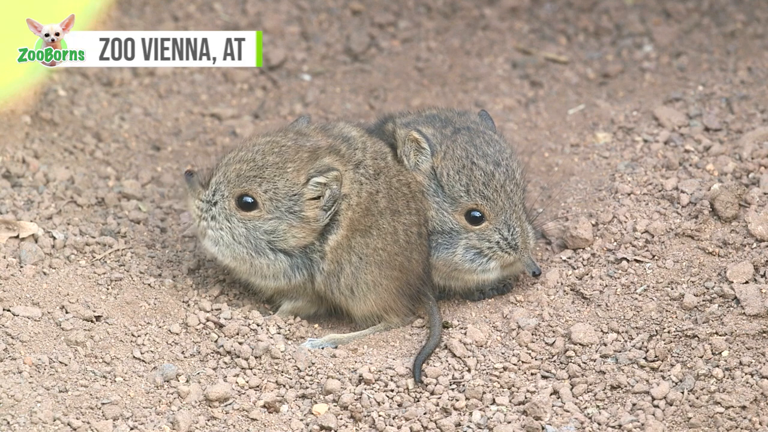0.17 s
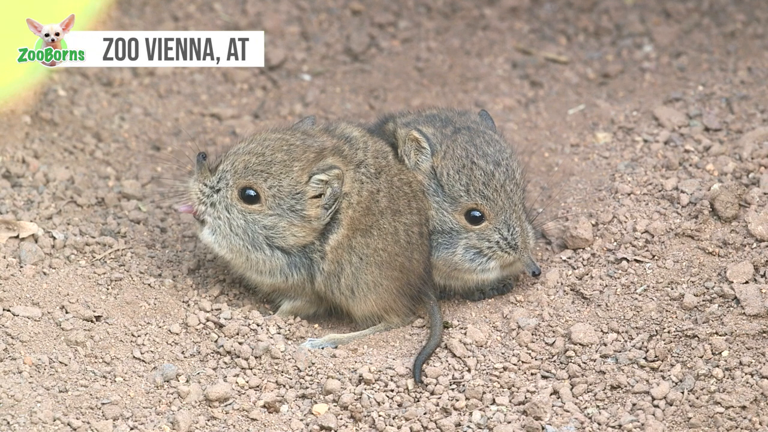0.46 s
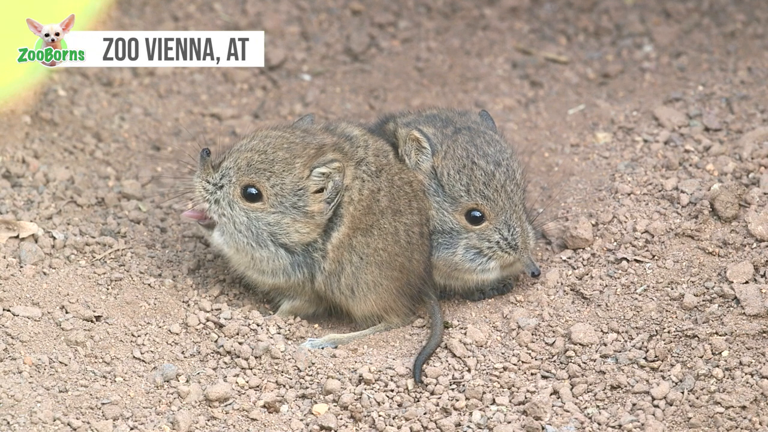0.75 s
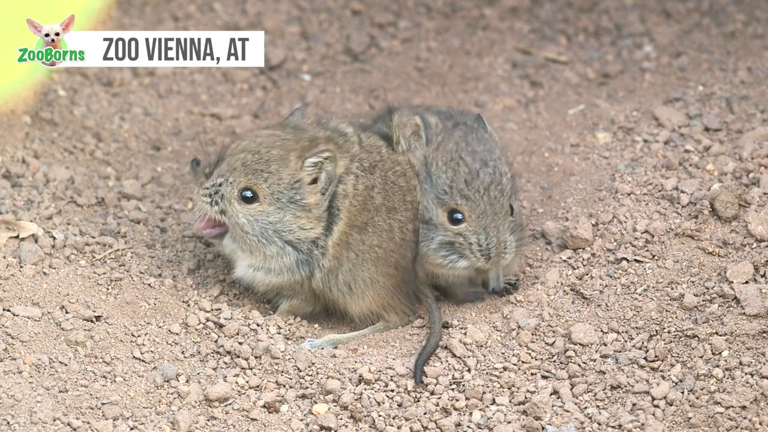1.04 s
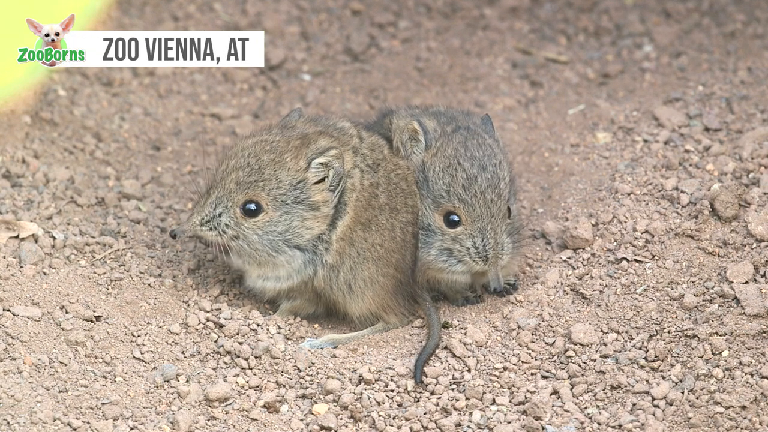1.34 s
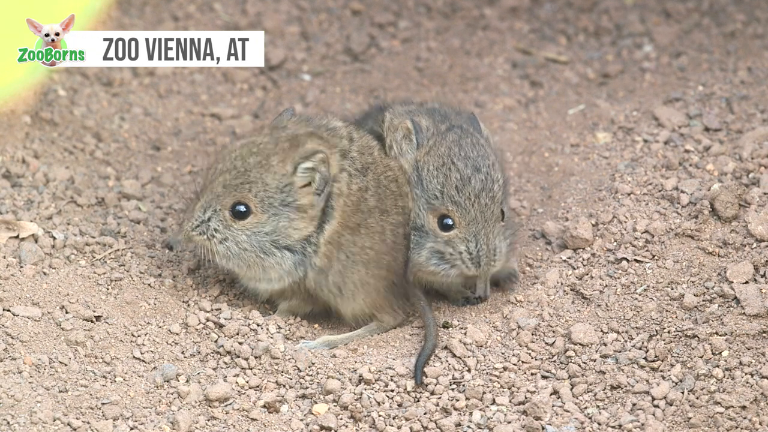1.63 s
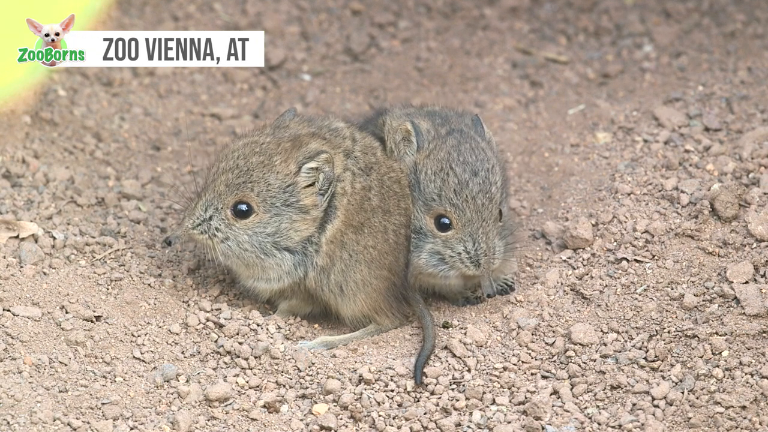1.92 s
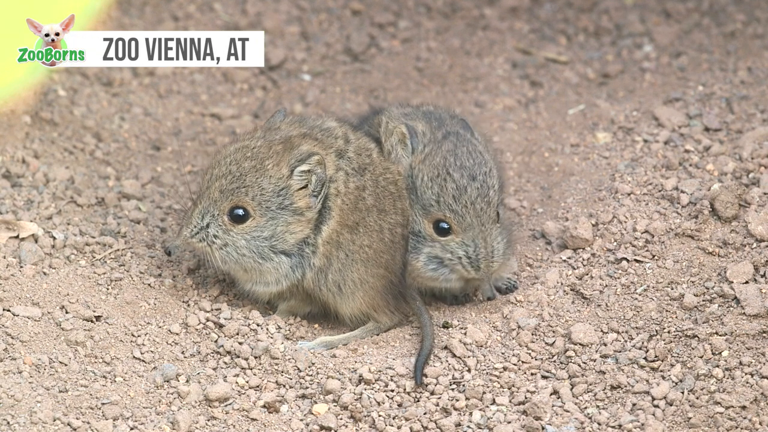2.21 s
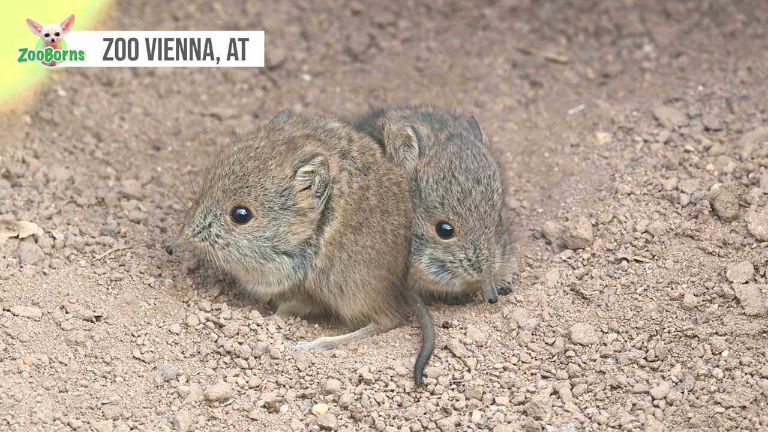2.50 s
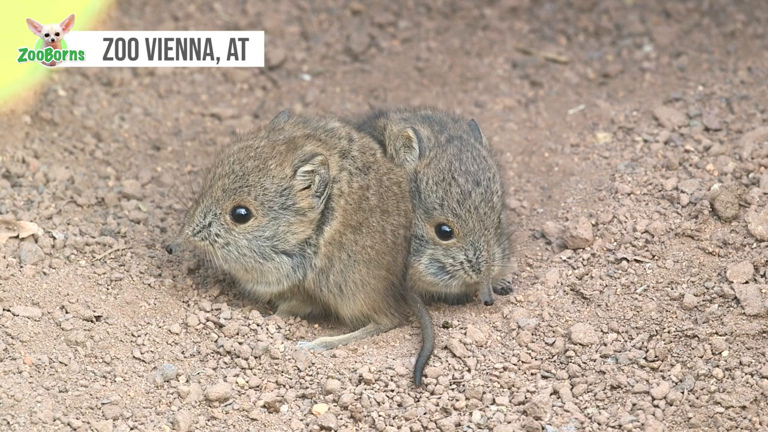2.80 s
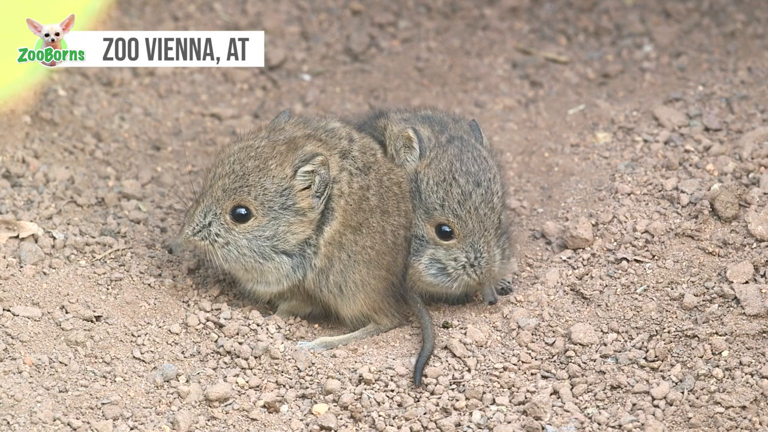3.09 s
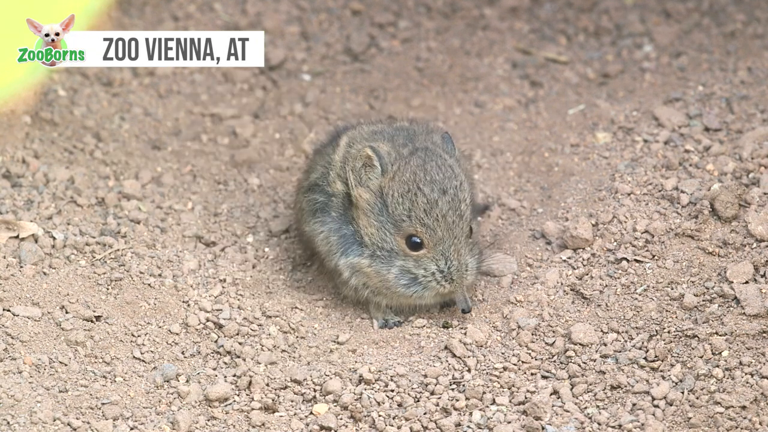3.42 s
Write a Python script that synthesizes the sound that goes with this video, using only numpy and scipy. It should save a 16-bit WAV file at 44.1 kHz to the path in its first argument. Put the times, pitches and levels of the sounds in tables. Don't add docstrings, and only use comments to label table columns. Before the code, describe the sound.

Many birds chirp and twitter in a large echoing indoor hall over low ventilation rumble.

```python
import sys
import numpy as np
from scipy import signal
from scipy.fft import rfft, irfft, next_fast_len
from scipy.io import wavfile
from scipy.ndimage import map_coordinates

SR = 44100
rng = np.random.default_rng(int(sys.argv[2]) if len(sys.argv) > 2 else 0)


def boost(x):
    u = np.asarray(x, float) / 20
    return 10 ** u


def to_wav(sig):
    pcm = np.clip(np.atleast_2d(sig), -1, 1) * 32767
    pcm = np.round(pcm).astype(np.int16)
    wavfile.write(sys.argv[1], SR, pcm.T)


N = 156555
ATTACK_S, RELEASE_S = .009, .006


def unit(x):
    return x / np.sqrt(np.mean(x ** 2) + 1e-20)


def along(points, hz):
    f, v = np.transpose(points)
    return np.interp(np.log(hz + 1), np.log(f + 1), v)


def over_time(points):
    return np.interp(np.arange(N) / SR, *np.transpose(points))


def wobble(rate, size):
    knots = rng.standard_normal(int(size * rate / SR) + 4)
    return map_coordinates(knots, [np.arange(size) * rate / SR])


def coloured(x, gain_db):
    m = next_fast_len(len(x) + 8192)
    gain = boost(gain_db(np.fft.rfftfreq(m, 1 / SR)))
    return irfft(rfft(x, m) * gain, m)[:len(x)]


def noise(spectrum):
    return unit(coloured(rng.standard_normal(N), lambda hz: along(spectrum, hz)))


def place(out, start, sound):
    out[start:][:len(sound)] += sound


def shape(t, length):
    return np.clip(np.minimum(t / ATTACK_S, (length - t) / RELEASE_S + .5), 0, 1)


def whistles(rows, tones, rough_hz, flutter_db, flutter_rate):
    out = np.zeros(N + SR)
    for s, length, start, end, db in rows:
        t = np.arange(int((length + RELEASE_S) * SR)) / SR
        hz = start + (end - start) * t / length + rough_hz * wobble(700, size=len(t))
        phase = 2 * np.pi * np.cumsum(hz) / SR
        note = sum(boost(g) * np.sin(k * phase) * (k * hz < SR / 2.2) for k, g in tones)
        strength = boost(db + 5.0 + flutter_db * wobble(flutter_rate, size=len(t)))
        place(out, round(s * SR), strength * shape(t, length) * note)
    return out[:N]


# frequency_hz, t60_s
HALL_DECAY = [(500, 1.95), (2000, 1.39), (4000, 1.08), (7000, 0.74), (12000, 0.35)]


def hall(x, direct_db, wet_db):
    out = boost(direct_db) * np.pad(x, (0, 2 * SR))
    step = SR // 6
    fade = signal.windows.hann(2 * step, sym=False)
    x = np.pad(x, (step, 2 * step))
    for at in range(0, N + step, step):
        part = x[at:at + 2 * step] * fade
        if part.any():
            hz, t, z = signal.stft(rng.standard_normal(SR), SR, nperseg=256)
            decay = boost(-60 * t / along(HALL_DECAY, hz)[:, None])
            tail = signal.istft(z * decay, SR, nperseg=256)[1]
            wet = signal.fftconvolve(part, tail / np.linalg.norm(tail))[max(step - at, 0):]
            place(out, max(at - step, 0), boost(wet_db) * wet)
    return out[:N]


# frequency_hz, density_db_per_hz
RUMBLE = [(53, -10.5), (90, -3), (189, 1), (210, -3), (441, -8), (479, -9), (698, -8), (1500, -22),
          (1950, -33), (3300, -120)]
# time_s, swell_db
FAN_LOAD = [(0, -4.5), (.5, 0), (1.1, -0.5), (1.4, 3), (2.2, 0), (2.6, -2.5), (3.3, -0.5), (3.55, 3)]
# time_s, strength_db
DRAUGHT = [(0.0, -77), (0.31, -55), (0.45, -62), (0.72, -52.5), (0.77, -63), (1.24, -57), (1.3, -74),
           (1.361, -65), (2.04, -58), (2.06, -64), (2.5, -56), (3.0, -69), (3.52, -51), (3.55, -53)]
# frequency_hz, density_db_per_hz
BUFFET = [(12, -41), (25, -18), (45, -12), (64, -1.5), (90, -15), (140, -120)]
# pitch_hz, level_db
HUM = [(64, -75), (126, -70.5)]
# frequency_hz, density_db_per_hz
HISS = [(1200, -120), (1700, -2.5), (5000, -4), (9000, -22.5), (15800, -31)]


def ventilation():
    rumble = noise(RUMBLE) * boost(-57 + over_time(FAN_LOAD) + 1.2 * wobble(3.12, size=N))
    draught = boost(over_time(DRAUGHT) - 1.5) * noise(BUFFET)
    hum = np.zeros(N)
    for hz, db in HUM:
        strength = boost(db + 3.5 + 3.7 * wobble(3.66, size=N))
        hum += strength * np.sin(2 * np.pi * np.cumsum(hz + 2.46 * wobble(3.9, size=N)) / SR)
    return rumble + draught + hum + boost(-55.5) * noise(HISS)


# time_s, activity_db
CROWD = [(0.0, -36), (.2, -41), (.45, -39), (0.69, -37.5), (1.18, -42), (1.48, -38), (1.93, -47),
         (2.45, -47), (2.61, -32.5), (2.77, -36.5), (3.55, -41)]
# multiple, level_db
TWEET_TONES = [(1, 0), (2, -40)]


def crowd(count=260):
    at, pitch, fall, long, size = rng.standard_normal((count, 5)).T
    s = (np.arange(count) + .5 + np.tanh(at) / 2) * N / SR / (count + 1)
    turn = 2 * (np.arange(count) * .382 % 1) - 1
    hz = 3650 * np.exp(.25 * (turn + .15 * pitch))
    end_hz = hz * np.exp(-.12 * (1 + np.tanh(fall) / 2))
    length = .04 * np.exp(.4 * long)
    db = np.interp(s, *np.transpose(CROWD)) - 10.5 + 1.5 * size
    rows = np.transpose([s, length, hz, end_hz, db])
    return whistles(rows, TWEET_TONES, rough_hz=190, flutter_db=4.5, flutter_rate=109.3)


# frequency_hz, density_db_per_hz
THROAT = [(530, -68.5), (900, -29.5), (1750, -13), (2280, -13), (2750, -3), (5110, -10), (6800, -29),
          (15700, -58.5)]


def earlier_calls():
    fade_db = -43.5 - 60 * np.arange(N) / SR / 1.8
    return noise(THROAT) * boost(fade_db)


# start_s, length_s, buzz_hz, level_db, brightness_db_per_octave
CHIRPS = [(0.01, 0.072, 715, -63, -10), (0.282, 0.05, 722, -53.5, -5), (0.42, .14, 799.4, -41.5, 4.5),
          (0.601, 0.082, 749.4, -37.5, -2), (0.755, 0.086, 761, -39, 5), (0.909, .14, 822, -38, 3.5),
          (1.16, 0.095, 708, -46.5, 10.5), (1.305, .12, 812, -36.5, 4), (1.43, 0.11, 740, -39.5, 1.5),
          (1.671, 0.061, 698.5, -43, -2.5), (1.855, 0.077, 780, -42.5, 12), (2.076, 0.059, 762, -41, 6),
          (2.376, 0.052, 689, -49.5, 9), (2.525, .06, 812, -38.5, 5), (2.569, 0.11, 801.5, -39, 5),
          (2.662, 0.085, 743, -45, -2), (2.879, 0.062, 743, -46, 2.5), (3.063, .12, 826, -33.5, 2),
          (3.298, .14, 764, -38, 2.5), (3.507, 0.028, 804, -43, 8)]


def chirps(sag=.15, jitter=.12, scatter_db=4):
    out = np.zeros(N + SR)
    lead = 400
    for s, length, rate, db, bright in CHIRPS:
        t = np.arange(int((length + RELEASE_S) * SR)) / SR
        buzz_hz = rate * (1 - sag * t / length + jitter * wobble(400, size=len(t)))
        cycles = np.cumsum(buzz_hz) / SR
        slaps = np.diff(np.floor(cycles), prepend=0) > 0
        pulses = slaps * boost(scatter_db * rng.standard_normal(len(t)))
        pulses = pulses * shape(t, length) * np.clip(t / .03, 0, 1)

        def throat_db(hz):
            tilt = bright * np.log2(np.clip(hz, 1500, 10000) / 3500)
            return along(THROAT, hz) + tilt - 60 * (hz < 800)

        buzz = coloured(np.pad(pulses, lead), throat_db)
        place(out, round(s * SR) - lead, boost(db) * unit(buzz))
    return out[:N]


# start_s, length_s, start_hz, end_hz, level_db
SQUAWKS = [
    (.72, 0.23, 545, 536.3, -54.5),
    (.92, .16, 540, 533, -59),
    (2.73, 0.219, 559.7, 545, -53.5),
]
# multiple, level_db
SQUAWK_TONES = [(1, -20), (1.5, -11), (2, -10), (2.5, -11), (3, -9), (3.5, -5), (4, 0), (5, -3)]


def squawks():
    return whistles(SQUAWKS, SQUAWK_TONES, rough_hz=58, flutter_db=5, flutter_rate=120)


# start_s, length_s, start_hz, end_hz, level_db
CROAKS = [
    (.635, 0.094, 604.6, 588, -55.5),
    (2.64, 0.0875, 626.6, 605, -56),
]
# multiple, level_db
CROAK_TONES = [(1, -9), (1.5, -12), (2.5, -9), (3, 1), (3.5, -2), (4, 2), (4.5, -3)]


def croaks():
    return whistles(CROAKS, CROAK_TONES, rough_hz=26, flutter_db=0.5, flutter_rate=65)


# start_s, length_s, start_hz, end_hz, level_db
HONKS = [
    (.55, .075, 605, 600, -57),
    (2.555, .08, 630, 625, -60),
]
# multiple, level_db
HONK_TONES = [(1, -16), (2, -3), (3, 2), (4, 3), (5, -3)]


def honks():
    return whistles(HONKS, HONK_TONES, rough_hz=19.0, flutter_db=1.5, flutter_rate=135)


# start_s, length_s, start_hz, end_hz, level_db
TWEETS = [(.345, .062, 3750, 3690, -35), (.82, .06, 3700, 3640, -37), (.81, .09, 3250, 3170, -42),
          (1.192, .07, 3200, 3330, -42), (1.788, .035, 3520, 3480, -45), (1.845, .11, 2990, 2940, -45),
          (2.12, .07, 3530, 3480, -42), (2.12, .06, 4170, 4150, -50), (2.37, .035, 1930, 2000, -57),
          (3.2, .025, 1750, 900, -51.5), (3.18, .12, 2950, 2950, -43), (.225, .11, 2960, 3080, -42),
          (1.355, .04, 3620, 3560, -39), (1.66, .12, 1720, 1680, -59), (3.105, .045, 3730, 3680, -37),
          (.0, 0.028, 4300, 4270, -41), (0.042, 0.044, 3660, 3660, -42),
              (0.153, 0.065, 3660, 3595, -37), (0.448, 0.11, 3720, 3653, -44.5),
              (0.559, 0.042, 3770, 3820, -51), (1.225, 0.069, 3576, 3520, -43),
              (1.37, 0.11, 4220, 4200, -43), (2.02, 0.088, 2950, 2727, -49.5),
              (2.191, 0.064, 3460, 3410, -50), (2.312, 0.088, 3265, 3190, -48.5),
              (2.512, 0.078, 2774, 2750, -47.5), (2.547, 0.06, 4420, 4400, -48),
              (2.864, 0.051, 3776, 3646, -37), (2.922, 0.067, 3460, 3220, -45),
              (3.328, .08, 3630, 3790, -45.5), (3.441, .1, 2896, 3064, -47)]


def tweets():
    return whistles(TWEETS, TWEET_TONES, rough_hz=86.0, flutter_db=3, flutter_rate=186)


# start_s, length_s, start_hz, end_hz, level_db
CRIES = [(1.312, .045, 4850, 4500, -38), (3.068, .045, 5800, 5200, -42), (2.585, 0.0447, 3800, 4400, -32.5),
         (2.675, 0.081, 2950, 3300, -49), (1.18, 0.032, 3800, 6000, -52), (1.42, .05, 5000, 3500, -37.5)]
# multiple, level_db
SWOOP_TONES = [(1, 0), (2, -33), (3, -38)]


def cries():
    return whistles(CRIES, SWOOP_TONES, rough_hz=280, flutter_db=3.5, flutter_rate=206)


# start_s, length_s, start_hz, end_hz, level_db
SWOOPS = [(.172, .055, 3400, 2900, -37), (1.35, .065, 3850, 2900, -36), (2.74, .072, 5300, 4000, -37),
          (2.803, .062, 4200, 2900, -33), (2.718, .03, 6000, 5300, -48), (3.125, .045, 3750, 2950, -33),
          (1.315, .06, 1150, 1950, -54), (1.365, .045, 2000, 1550, -47.5), (1.415, .04, 1550, 1300, -56),
          (3.1, .075, 2000, 1450, -52)]


def swoops():
    return whistles(SWOOPS, SWOOP_TONES, rough_hz=150, flutter_db=1.5, flutter_rate=180)


# time_s, peak_db
CLACKS = [
    (1.4204, -20.5),
    (1.4551, -19),
    (1.7212, -25),
    (2.8569, -15),
    (2.8874, -17.5),
]


def clacks():
    out, t = np.zeros(N), np.arange(-200, 200) / SR
    tick = np.exp(-(t / .0007) ** 2) * np.sin(2 * np.pi * 3500 * t)
    for s, db in CLACKS:
        place(out, round(s * SR) - 200, boost(db - 3) * tick)
    return out


# start_s, length_s, start_hz, end_hz, level_db
PEEPS = [(.13, .024, 4260, 4220, -31), (.176, .042, 4210, 4200, -31), (.221, .026, 4200, 4190, -35),
         (.257, .044, 4205, 4200, -33), (.299, .11, 4205, 4195, -39), (.596, .037, 4470, 4310, -36),
         (.632, .02, 4270, 4240, -27), (.674, .018, 4250, 4230, -29), (.702, .018, 4260, 4260, -32),
         (.722, .024, 4260, 4250, -33), (.76, .035, 4230, 4200, -36), (1.222, .04, 4320, 4300, -45)]
# multiple, level_db
PEEP_TONES = [(1, 0), (2, -46), (3, -56)]
# start_s, length_s, start_hz, end_hz, level_db
SHRILL = [
    (.135, 0.051, 12700, 12600, -76),
    (.625, .065, 12900, 12650, -77),
]


def peeps():
    plain = whistles(PEEPS, PEEP_TONES, rough_hz=25, flutter_db=-0.5, flutter_rate=120)
    shrill = whistles(SHRILL, [(1, 0)], rough_hz=60, flutter_db=3.5, flutter_rate=60)
    return plain + shrill


def scene():
    mix = ventilation() + earlier_calls()
    mix = mix + hall(crowd(), direct_db=-8, wet_db=0.2)
    mix = mix + hall(chirps() + squawks() + croaks() + cries(), direct_db=-9, wet_db=-2.5)
    mix = mix + hall(honks() + tweets() + swoops(), direct_db=-1, wet_db=-5.5)
    mix = mix + hall(clacks() + peeps(), direct_db=-1, wet_db=-8)
    return np.tile(mix, (2, 1))


def band_limit(x):
    return signal.sosfilt(signal.butter(12, 15880, fs=SR, output="sos"), x)


def record(dry):
    return band_limit(dry)


dry = scene()
out = record(dry)
to_wav(out)
```